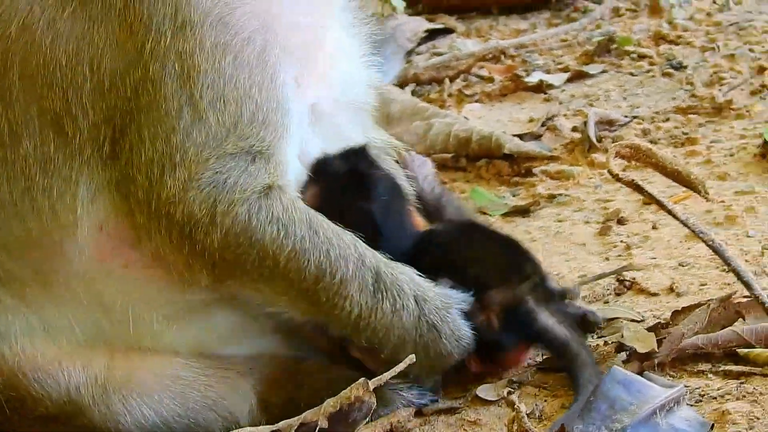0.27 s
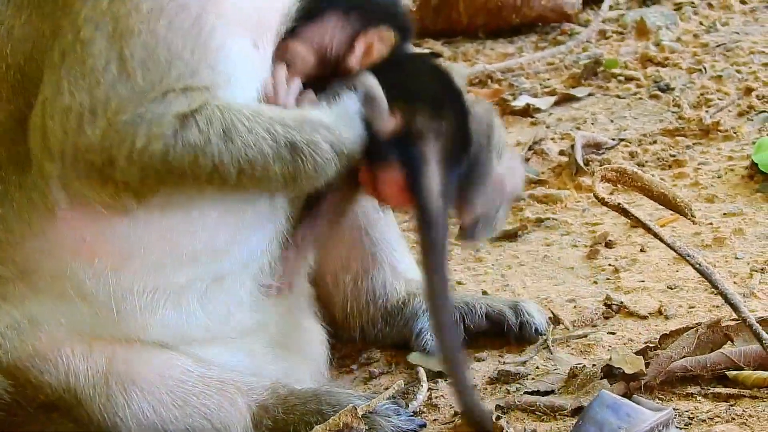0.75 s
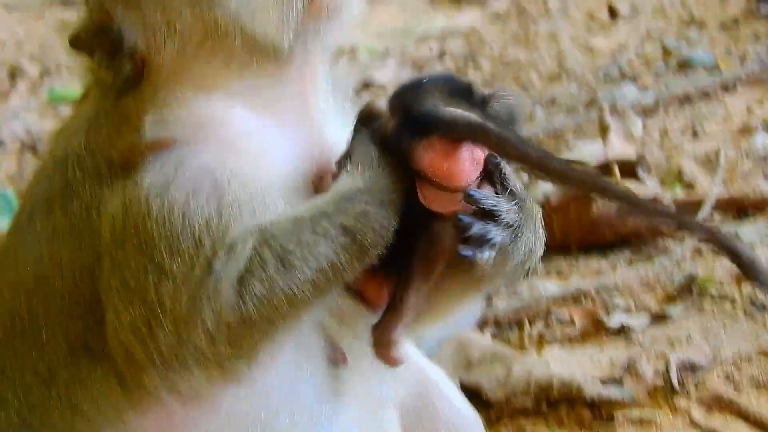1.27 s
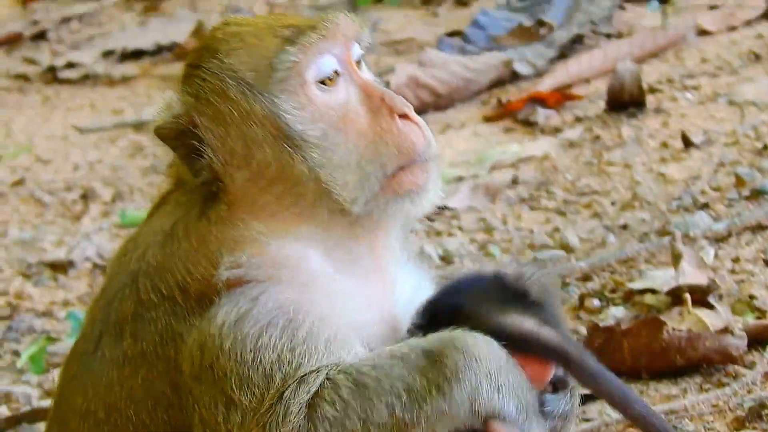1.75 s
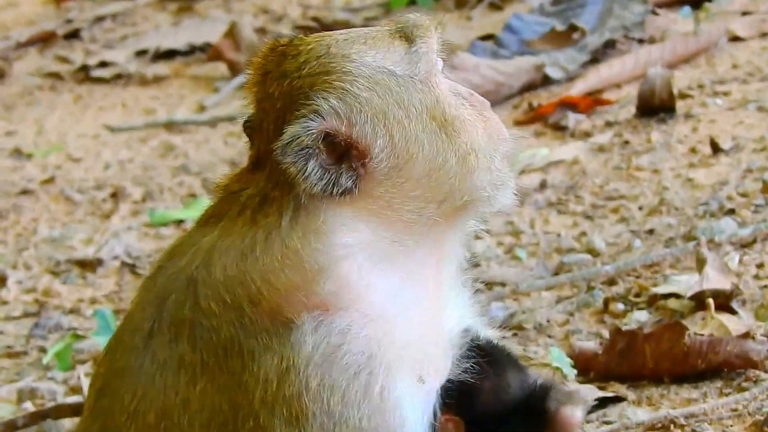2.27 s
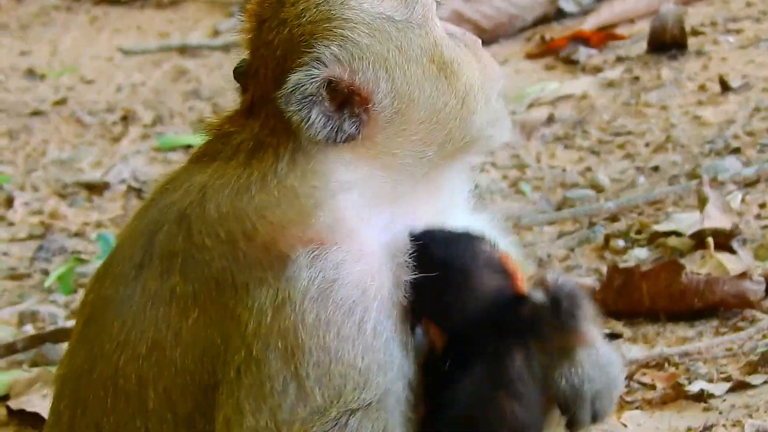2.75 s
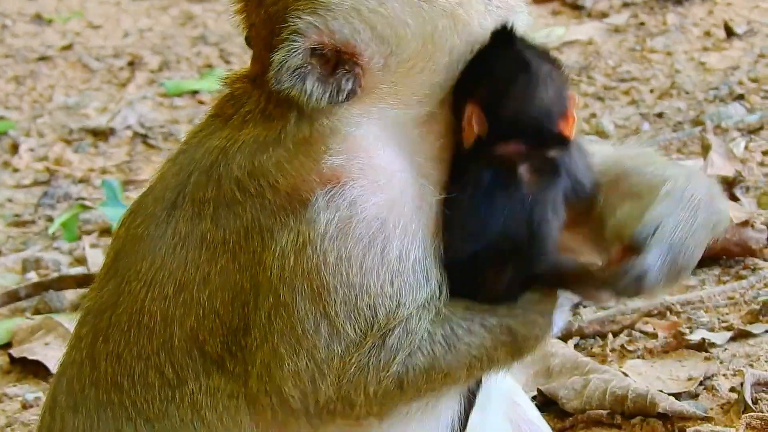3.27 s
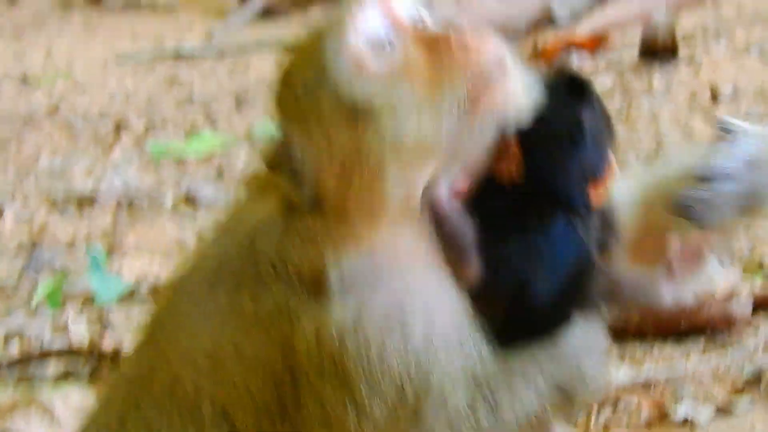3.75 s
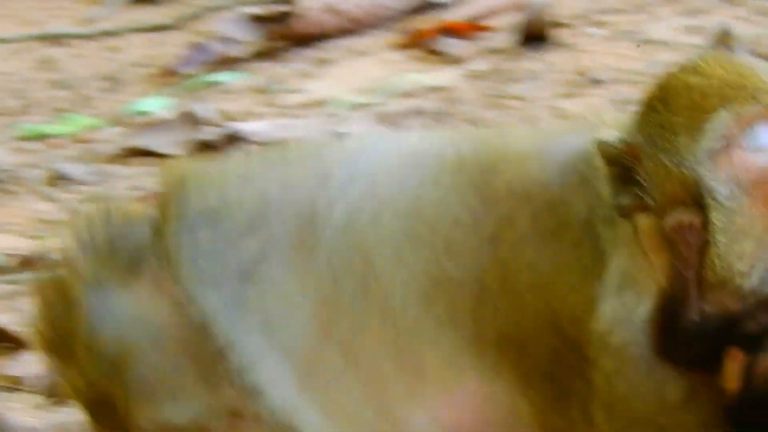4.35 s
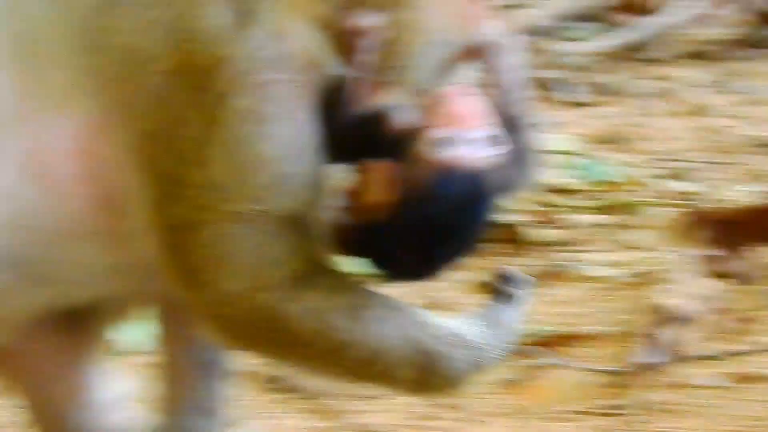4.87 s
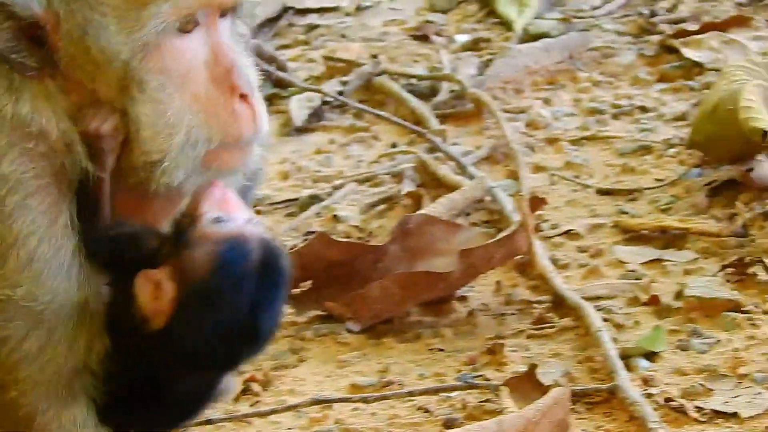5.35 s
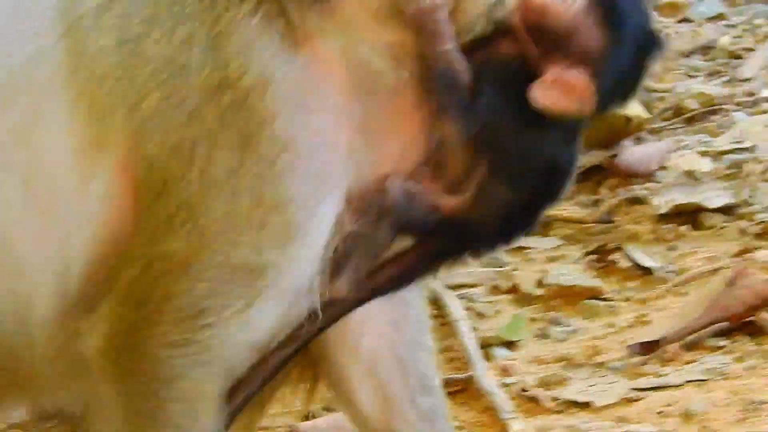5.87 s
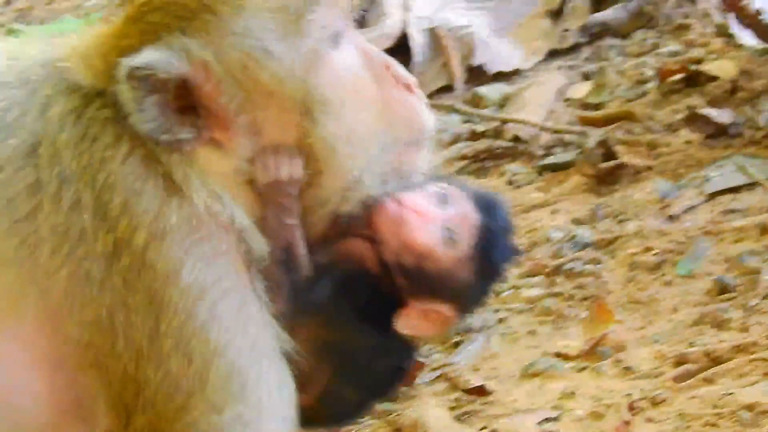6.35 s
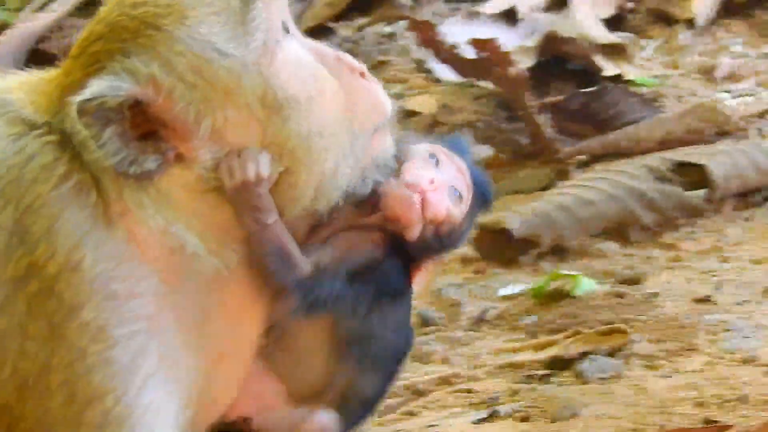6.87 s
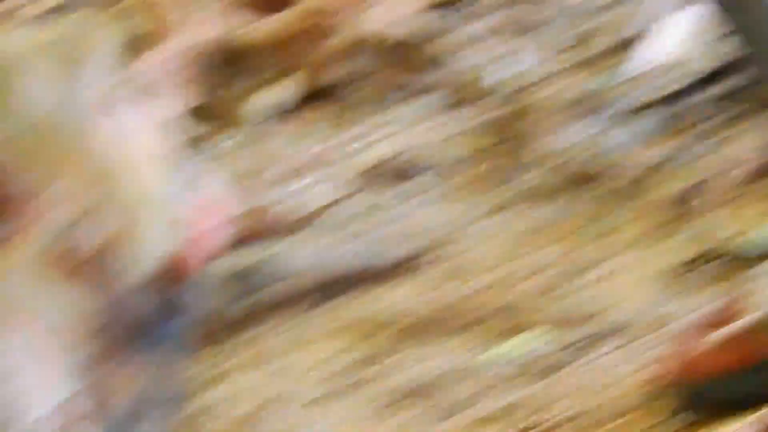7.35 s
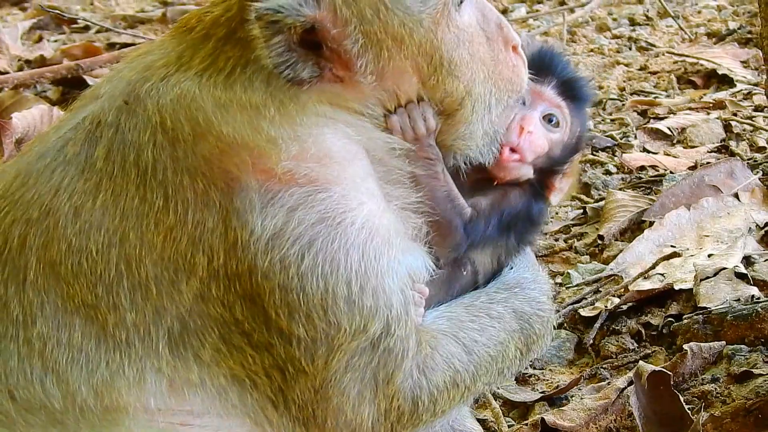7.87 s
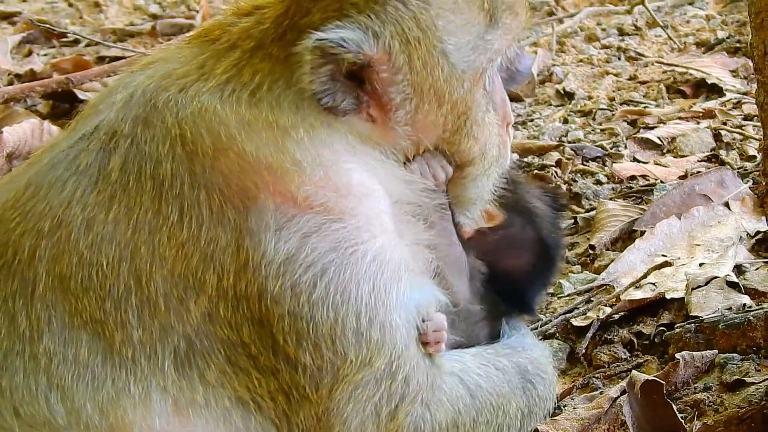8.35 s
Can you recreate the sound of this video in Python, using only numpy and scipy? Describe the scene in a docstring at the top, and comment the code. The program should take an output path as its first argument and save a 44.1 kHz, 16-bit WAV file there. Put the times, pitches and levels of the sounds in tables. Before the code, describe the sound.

Daytime forest insects pulse in a high, dense buzz, with repeated short bird whistles, tiny sharp chips and a few dry leaf crackles close by.

```python
"""A forest by day: a cicada chorus of random clicks, coloured by a body spectrum, throbs near 4.6 kHz.
A faint insect's click trains buzz above it; filtered noise gives far rumble, air in the leaves, drone and hiss.
One bird repeats a short whistle that drops at its end, others call further off, all gliding sines with octaves,
smeared by noise echoes among the trunks.
A small bird gives sharp chips, fast downward sweeps, and dry leaves snap close by, bursts of crackle."""
import sys
import numpy as np
from scipy import signal
from scipy.fft import rfft, irfft, next_fast_len
from scipy.io import wavfile

SR = 44100
rng = np.random.default_rng(int(sys.argv[2]) if len(sys.argv) > 2 else 0)


def log_audio(samples):
    """Write samples as a 16-bit WAV file to the path given in sys.argv[1]."""
    # one column per channel
    frames = np.atleast_2d(samples).T
    # limit to full scale, then quantise
    limited = np.clip(frames, -1, 1)
    pcm = np.round(limited * 32767).astype(np.int16)
    wavfile.write(sys.argv[1], SR, pcm)


def gain_from_db(level_db):
    """Turn a decibel level (scalar or array-like) into a linear amplitude factor."""
    decades = np.asarray(level_db, float) / 20
    return 10 ** decades


N = 379701


def rms_one(x):
    """Scales to rms 1."""
    return x / np.sqrt(np.mean(x ** 2) + 1e-20)


def in_time(rows):
    """Columns of a curve table at every sample."""
    s, *columns = np.transpose(rows)
    return [np.interp(np.arange(N) / SR, s, c) for c in columns]


def at_hz(points, hz):
    """Reads a spectrum on a log frequency axis."""
    points_hz, values = np.transpose(points)
    return np.interp(np.log(hz), np.log(points_hz), values)


def drift(corner_hz):
    """Slow random signal of rms 1: two-pole low-passed noise, made at SR / 40."""
    r = np.exp(-2 * np.pi * corner_hz * 40 / SR)
    noise = rng.standard_normal(N // 40 + 2002)
    slow = signal.lfilter([1], [1, -2 * r, r * r], noise)[2000:]   # drops the filter's start
    return np.interp(np.arange(N) / 40, np.arange(len(slow)), rms_one(slow - slow.mean()))


def band(x, low_hz, high_hz):
    """Butterworth band-pass."""
    sos = signal.butter(2, [low_hz, min(high_hz, .45 * SR)], "band", fs=SR, output="sos")
    return signal.sosfilt(sos, x + 1e-18)


def diffuse(mid, side, spectrum):
    """Colours two unrelated signals and spreads them left and right; mid rms 1."""
    # left-right correlation: (frequency [Hz], likeness [-1..1])
    likeness = [(40, 0.98), (150, 0.91), (350, 0.65), (1200, 0.49), (3000, 0.48), (4600, 0.49),
                (9000, -0.14)]
    size = next_fast_len(N)
    hz = np.maximum(np.arange(size // 2 + 1) * SR / size, 1)
    inside = (hz >= spectrum[0][0]) & (hz <= spectrum[-1][0])
    alike = np.clip(at_hz(likeness, hz), -.99, .99)
    gain = gain_from_db(at_hz(spectrum, hz)) * inside
    side_gain = gain * np.sqrt((1 - alike) / (1 + alike))
    mid = irfft(rfft(mid, size) * gain, size)[:N]
    side = irfft(rfft(side, size) * side_gain, size)[:N]
    return np.array([mid + side, mid - side]) / np.std(mid)


def forest(x, direct_db, stretch, side_db):
    """Direct sound, then dense echoes that hold their level while further trunks answer, and die away."""
    # echo bands, times before stretch: (low [Hz], high [Hz], hold [s], t60 [s])
    trunks = [(296, 1600, 0.17, 0.66), (2100, 2330, 0.029, 0.49), (2880, 9100, 0.25, 2.08)]
    t = np.arange(2 * SR) / SR
    echoes = rng.standard_normal((2, len(t))) * gain_from_db([[0], [side_db]])
    echoes = echoes * gain_from_db(1.5 * drift(45)[:len(t)])   # trunks stand in clumps
    shaped = np.zeros((2, len(t)))
    for k, (low_hz, high_hz, hold_s, t60_s) in enumerate(trunks):
        decay = gain_from_db(-60 * np.maximum(t - hold_s * stretch, 0) / (t60_s * stretch))
        shaped += (-1) ** k * band(echoes, low_hz, high_hz) * decay
    shaped = shaped * np.minimum(t / 0.015, 1) / np.sqrt(SR * 0.014)
    shaped[0, 0] += gain_from_db(direct_db)
    mid, side = signal.fftconvolve(x[None], shaped, axes=1)[:, :N]
    return np.array([mid + side, mid - side])


def add(out, s, sound):
    """Mixes a sound in at time s; what lies before time zero is not heard."""
    i = round(s * SR)
    sound, i = sound[max(-i, 0):], max(i, 0)
    out[i:i + len(sound)] += sound[:N - i]


def glide(length_s, start_hz, end_hz, db, octave_db, waver=0):
    """One gliding note with its octave; the pitch is unsteady from one 8 ms to the next."""
    steps = np.arange(round(length_s * SR))
    unsteady = 1 + waver * np.interp(steps / (0.00792 * SR), np.arange(40), rng.standard_normal(40))
    pitch_hz = unsteady * np.geomspace(start_hz, end_hz, len(steps))
    phase = 2 * np.pi * np.cumsum(pitch_hz) / SR
    tone = gain_from_db(db) * np.sin(phase) + gain_from_db(octave_db) * np.sin(2 * phase)
    return np.sqrt(np.hanning(len(phase))) * tone


def ambience():
    """Far rumble, a faint drone and the hush of air in the leaves waver over a smooth hiss: coloured noises."""
    # noise spectra: (frequency [Hz], relative density [dB per Hz])
    rumble_spectrum = [(12, -34), (20, -28), (59, 0), (108, 0.5), (188, -6), (212, -7), (259, -23),
                       (280, -23.5), (360, -41), (620, -120)]
    hiss_spectrum = [(2500, -3.5), (3500, -11), (4500, -7), (6000, -2), (8000, -10.5), (10000, -14.5),
                     (12500, -15.5), (14000, -24.5), (15600, -22)]
    drone_spectrum = [(600, -47), (645, 20), (675, 7), (720, -35)]
    air_spectrum = [(200, -9), (260, -2), (400, -5), (700, -7.5), (1100, -13.5), (2000, -10), (2700, -22),
                    (3400, -15.5), (4200, -14)]
    # rumble level: (time [s], level [dB])
    rumble_level = [(0, -45), (2.3, -47), (3.05, -43.5), (3.6, -44.5), (4.6, -46.5), (6.9, -45),
                    (8.61, -44)]

    def noise(spectrum):
        return diffuse(*rng.standard_normal((2, N)), spectrum)

    rumble = gain_from_db(in_time(rumble_level)[0] + 1.3 * drift(5.6)) * noise(rumble_spectrum)
    hiss = gain_from_db(-57.5 + .5 * drift(14.0)) * noise(hiss_spectrum)
    drone = gain_from_db(-72.5 + 2 * drift(3)) * noise(drone_spectrum)
    air = noise(air_spectrum)
    edges_hz = np.geomspace(150, 5000, 8)
    patchy = np.zeros((2, N))
    for k, (low_hz, high_hz) in enumerate(zip(edges_hz, edges_hz[1:])):
        # alternate signs join the bands
        patchy += (-1) ** k * band(air, low_hz, high_hz) * gain_from_db(3 * drift(10.8))
    return rumble + hiss + drone + gain_from_db(-60.5) * patchy


def buzz():
    """Two steady click trains whose rates waver a little give a comb of treble lines; near echoes smear them."""
    # buzz spectrum: (frequency [Hz], relative density [dB per Hz])
    buzz_spectrum = [(6500, -34), (8300, 10.5), (9500, 3), (10200, 0), (11400, 1), (12600, 6.5),
                     (14000, -5), (15500, -30)]
    click_rate_hz, buzz_db = 285.1, -65.5
    clicks = 0
    for waver in (.0008, .006):
        turns = np.cumsum(click_rate_hz * (1 + waver * drift(3.7))) / SR
        clicks = clicks + gain_from_db(1) * np.diff(np.floor(turns), prepend=0)
    echoes = rng.standard_normal((2, 900)) * np.exp(-np.arange(900) / (SR * 0.005))
    phases = rfft(echoes, 2048)
    echoes = irfft(phases / np.abs(phases))   # delays each pitch differently without colouring it
    smeared = signal.fftconvolve(clicks[None], echoes, axes=1)[:, :N]
    return gain_from_db(buzz_db) * diffuse(*smeared, buzz_spectrum)


def close_sounds():
    """Chips are steep downward sweeps of a few ms; snaps are bursts of fine crackle that die fast."""
    # chips: (time [s], level [dB], top [Hz], bottom [Hz])
    chips = [(3.474, -45, 7060, 5500), (3.723, -41, 7960, 6300), (3.9565, -44, 7760, 6000),
             (4.4795, -40, 7640, 5300), (4.655, -46, 8900, 6860), (4.881, -44, 7800, 5840),
             (5.2825, -41, 8000, 5600)]
    # leaf snaps and rustles: (time [s], peak [dB], low [Hz], high [Hz], decay constant [s])
    snaps = [(3.862, -41, 1800, 3900, 0.046), (4.615, -39, 700, 3770, .008), (4.81, -43, 800, 2300, 0.028),
             (5.28, -47, 400, 2500, .015), (6.21, -46, 496, 2530, 0.024), (7.41, -43, 400, 3000, 0.03),
             (7.97, -50, 400, 1500, 0.042), (8.52, -31.5, 1500, 3900, 0.004),
             (8.5301, -22, 3930, 7900, 0.0075)]
    out = np.zeros(N)
    for s, db, top_hz, bottom_hz in chips:
        add(out, s - .002, glide(0.0068, top_hz, bottom_hz, db, -99))
    for s, db, low_hz, high_hz, decay_s in snaps:
        t = np.arange(round(5 * decay_s * SR)) / SR
        grains = (rng.random(len(t)) < .1) * rng.standard_normal(len(t))
        crackle = grains * np.exp(-t / decay_s)
        crackle[0] = 3   # strong first break
        crackle = band(band(crackle, low_hz, high_hz), low_hz, high_hz)
        add(out, s, gain_from_db(db) * crackle / np.abs(crackle).max())
    return out + gain_from_db(-3) * forest(out, direct_db=-26, stretch=0.056, side_db=2)


def far_birds():
    """Pipings, single calls, a random chatter of short glides and a thin trill, all through the trunk echoes."""
    # All levels are ahead of the forest.
    # steady piping, octave the stronger: (time [s], length [s], start [Hz], end [Hz], octave level [dB])
    pipings = [(.78, 0.19, 1690, 1670, -60), (3.342, 0.11, 1930, 1890, -60),
               (3.45, 0.16, 1870, 1788, -53.5), (3.605, 0.095, 1780, 1768, -48),
               (3.725, 0.087, 1733, 1663, -51.5), (4.305, 0.112, 1730, 1743, -54),
               (4.475, 0.049, 1760, 1746, -52), (6.302, 0.067, 1760, 1740, -67),
               (7.476, 0.187, 1609, 1567, -64)]
    # rougher calls of other birds: (time [s], length [s], start [Hz], end [Hz], level [dB])
    notes = [(-.08, 0.31, 2094, 2036, -47.5), (0.05, 0.1, 1650, 1620, -63), (0.08, 0.032, 2500, 2500, -53),
             (.46, 0.023, 837, 846, -60), (1.822, 0.21, 1790, 1996, -63), (2.038, 0.087, 2043, 2060, -56.5),
             (2.354, .2, 2030, 2056, -50.5), (2.44, .089, 2300, 2393, -58), (3.2, 0.094, 6750, 7000, -56),
             (3.25, .3, 7120, 7000, -65), (3.25, 0.063, 7340, 7200, -63), (3.82, 0.08, 2050, 1800, -50.5),
             (3.868, 0.13, 2700, 3400, -53.5), (4.0, 0.21, 3420, 3370, -57),
             (3.893, 0.0383, 2243, 2042, -45), (3.916, 0.071, 1880, 1840, -49),
             (3.92, 0.023, 894, 920, -59), (3.941, .06, 1039, 1940, -54), (3.955, 0.053, 2250, 2780, -46.5),
             (3.999, 0.22, 2000, 1890, -55.5), (4.338, 0.045, 1970, 2120, -49.5),
             (4.531, 0.053, 1926, 2105, -48), (4.652, .03, 2100, 2045, -52),
             (4.809, .084, 1300, 1557, -60.5), (5.482, 0.039, 2430, 2436, -59),
             (7.409, .056, 1702, 1745, -58.5), (7.34, 0.095, 1920, 1890, -62.5),
             (7.501, .086, 2050, 1810, -60), (7.963, .05, 1146, 1380, -62),
             (8.279, 0.073, 2012, 1976, -53.5), (8.351, 0.064, 2120, 2040, -52.5),
             (8.526, .08, 2100, 2023, -57.5), (8.426, 0.085, 1477, 1336, -58)]
    # chatter of many birds: (time [s], level [dB])
    chatter_level = [(0, -54), (.5, -64.5), (1.6, -70), (2.3, -62), (3.4, -63.5), (4.1, -59), (5.0, -64.5),
                     (6.5, -76.5), (7.4, -72.5), (7.9, -73.5), (8.61, -61)]
    # long thin trill: (time [s], pitch [Hz], level [dB])
    trill_curve = [(5.0, 1900, -62.5), (5.6, 1888, -63), (6.05, 1890, -62), (6.3, 1920, -82)]
    out, chatter = np.zeros(N), np.zeros(N)
    for s, length_s, start_hz, end_hz, db in pipings:
        add(out, s, glide(length_s, start_hz, end_hz, db - 7, db, waver=.012))
    for s, length_s, start_hz, end_hz, db in notes:
        waver = 38 / start_hz + .3 * abs(np.log(end_hz / start_hz))   # a wider glide is less steady
        add(out, s, glide(length_s, start_hz, end_hz, db, db - 30, waver))
    for when, pitch, bend, size in rng.random((900, 4)):
        hz = 1400 * 1.65 ** pitch
        add(chatter, when * N / SR, glide(0.02056, hz, hz * (0.764 + .5 * bend), -9 * size, -13))
    chatter = gain_from_db(in_time(chatter_level)[0]) * rms_one(chatter)
    trill_hz, trill_db = in_time(trill_curve)
    t = np.arange(N) / SR
    sounding = (t > trill_curve[0][0]) & (t < trill_curve[-1][0])
    trill_phase = 2 * np.pi * np.cumsum(trill_hz * (1 + 0.0132 * drift(25.8))) / SR
    trill = gain_from_db(trill_db) * sounding * np.sin(trill_phase)
    calls = forest(out, direct_db=6, stretch=0.38, side_db=-8)
    return calls + forest(trill + chatter, direct_db=2.5, stretch=0.46, side_db=-11)


def whistler():
    """A held note sagging slightly, then a fast drop heard mostly in the octave, which is the stronger partial."""
    # whistles: (time [s], pitch [Hz], level ahead of envelope and forest [dB], sag [share of pitch])
    whistles = [(0.173, 1546, -42, 0.015), (.8, 1558, -42.5, 0.027), (1.512, 1531, -41, 0.023),
                (2.807, 1526, -43, 0.0656), (6.667, 1528, -46.5, 0.047)]
    held_s, drop_s, octave_db = .035, .013, 4
    end_s = held_s + drop_s
    out = np.zeros(N)
    t = np.arange(round(end_s * SR)) / SR
    shape = np.interp(t, [0, .012, held_s, held_s + 0.29 * drop_s, end_s], [0, 0.82, 0.82, 0.82, 0.42])
    fundamental_gain = gain_from_db(-18 * (t > held_s + .003))
    for s, hz, db, sag in whistles:
        pitch_hz = hz * np.interp(t, [0, held_s, end_s], [1, 1 - sag, .78])
        phase = 2 * np.pi * np.cumsum(pitch_hz) / SR
        octaves = gain_from_db(octave_db) * (np.sin(2 * phase) + gain_from_db(-17) * np.sin(4 * phase))
        add(out, s, gain_from_db(db) * shape * (fundamental_gain * np.sin(phase) + octaves))
    return forest(out, direct_db=-3.0, stretch=0.61, side_db=-12.5)


def cicadas():
    """Thousands of uneven tymbal clicks a second ring the bodies; the near singers' swells beat together."""
    # ringing of tymbals and bodies: (frequency [Hz], relative density [dB per Hz])
    tymbal = [(3750, -30), (3840, -18.5), (4070, -9.5), (4250, -3), (4410, 1), (4630, 3.5), (4850, 1.5),
              (5100, -2), (5900, -19), (6450, -21.5), (7500, -40), (9750, -52)]
    # singers out of the chorus: (swell rate [1/s], first swell [s], power scale [re steady chorus])
    singers = [(4.40, .208, 1.7), (4.272, .014, 1.6), (4.97, .04, 1.4), (4.68, .168, .9), (5.335, .07, .9)]
    chorus_db, flutter_db, rise_s, fall_s = -42, .5, 0.011, 0.05
    clicks = (rng.random((2, N)) < 15000 / SR) * rng.normal(0, 1, (2, N))
    power = 1   # steady chorus
    for rate_hz, first_s, share in singers:
        since_s = (np.arange(N) / SR - first_s) % (1 / rate_hz)
        power = power + share * (1 - np.exp(-since_s / rise_s)) * np.exp(-since_s / fall_s)
    return gain_from_db(chorus_db + flutter_db * drift(4.4)) * np.sqrt(power) * diffuse(*clicks, tymbal)


def scene():
    """All sources; far birds, whistler and ambience sit a little to the right, the cicadas to the left."""
    birds = (whistler() + far_birds()) * gain_from_db([[-.6], [.6]])
    chorus = cicadas() * gain_from_db([[.55], [-.55]])
    background = ambience() * gain_from_db([[-.4], [.4]])
    return chorus + buzz() + background + birds + close_sounds()


def band_limit(x):
    """A steep low-pass at the top of the band."""
    return signal.sosfilt(signal.butter(12, 15640, fs=SR, output="sos"), x)


def record(dry):
    """Delivers the finished mix."""
    return band_limit(dry)


dry = scene()
out = record(dry)
log_audio(out)
```